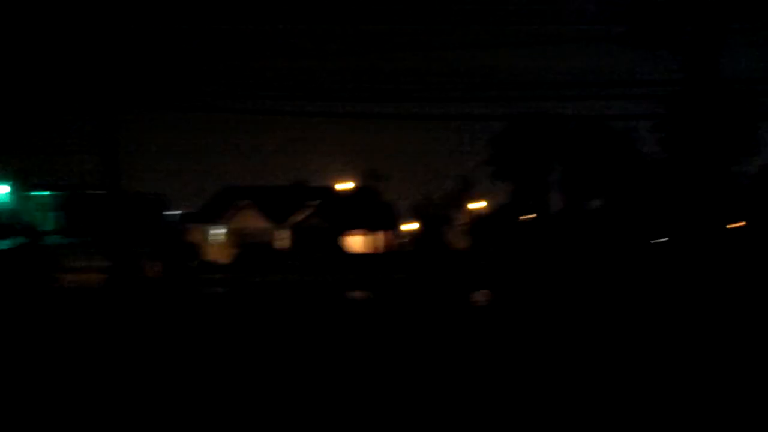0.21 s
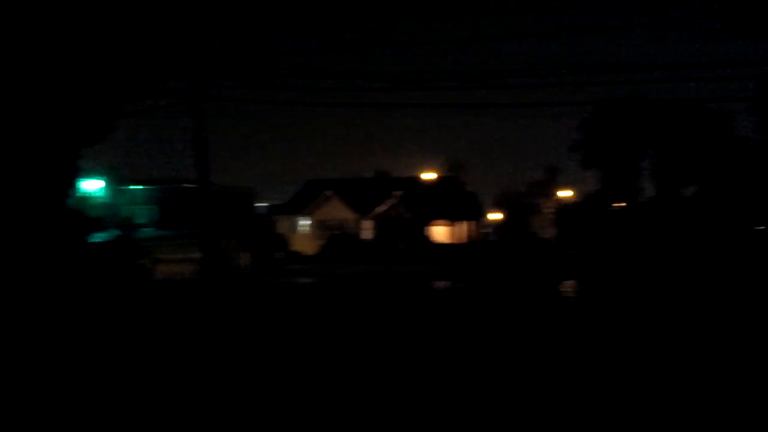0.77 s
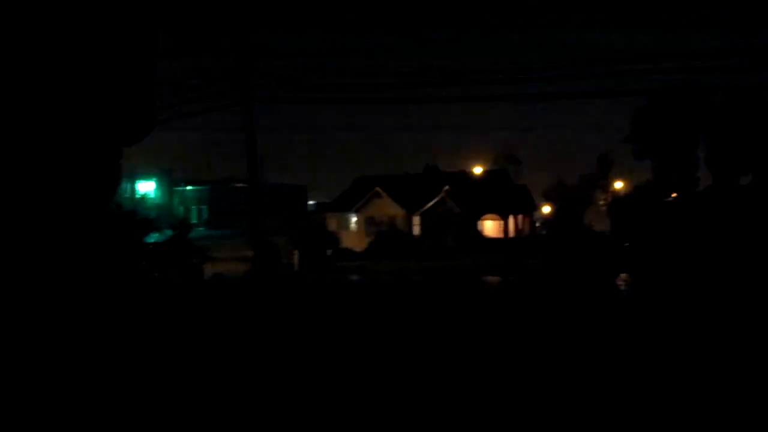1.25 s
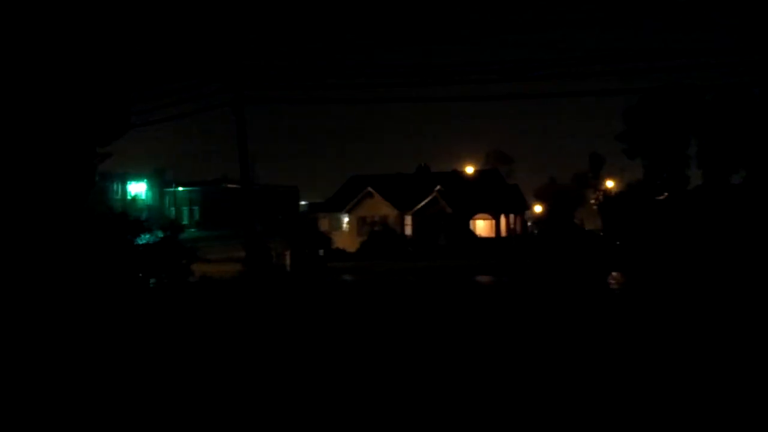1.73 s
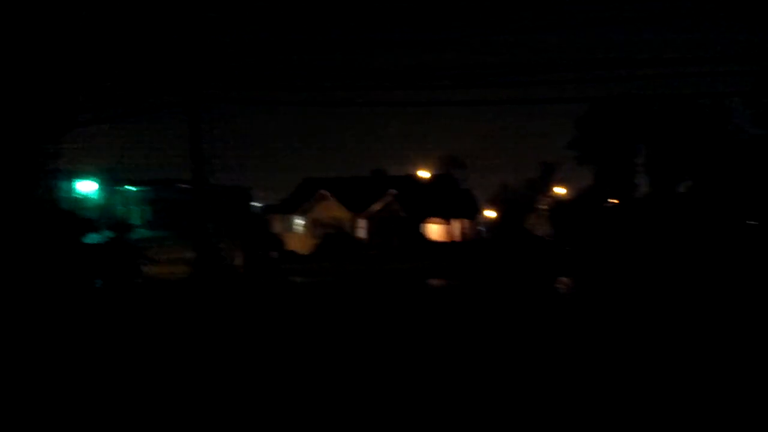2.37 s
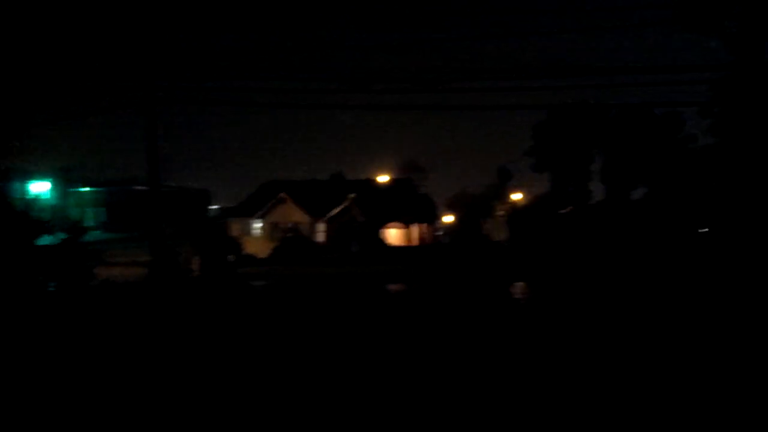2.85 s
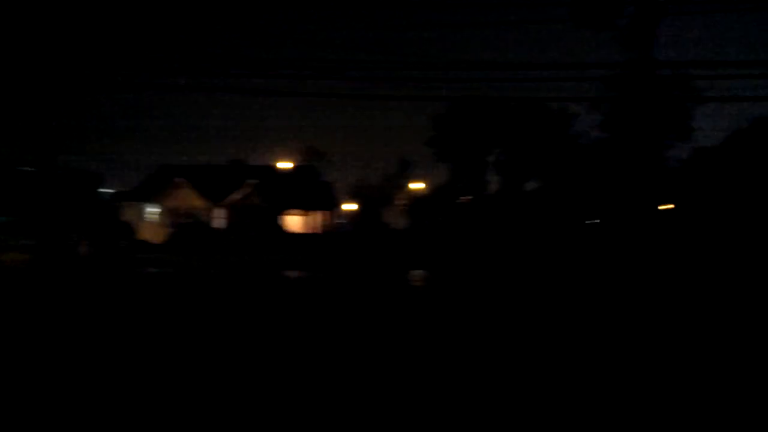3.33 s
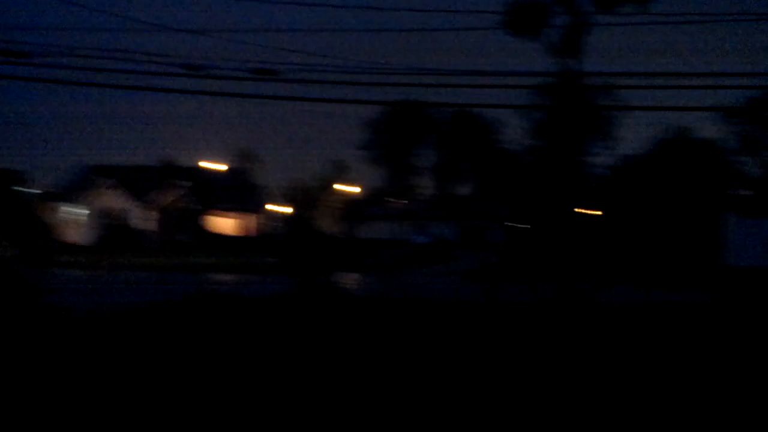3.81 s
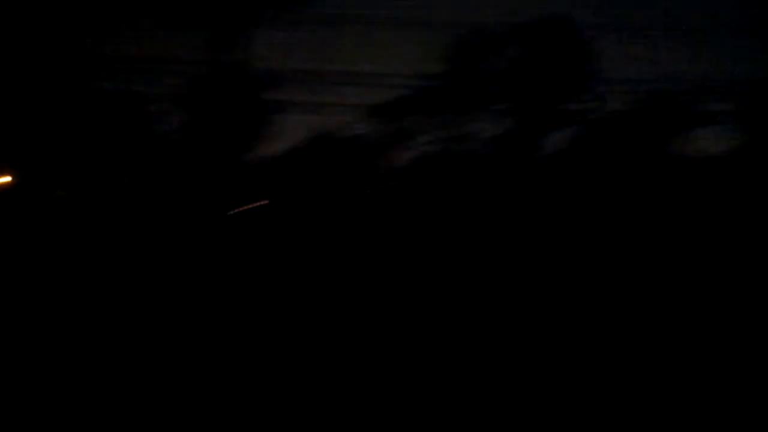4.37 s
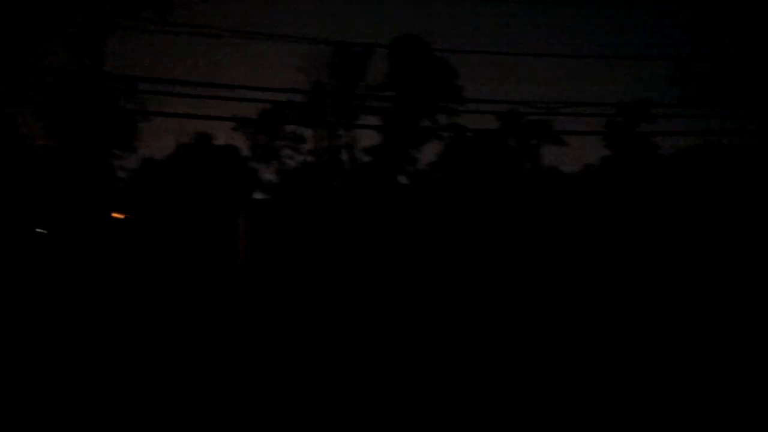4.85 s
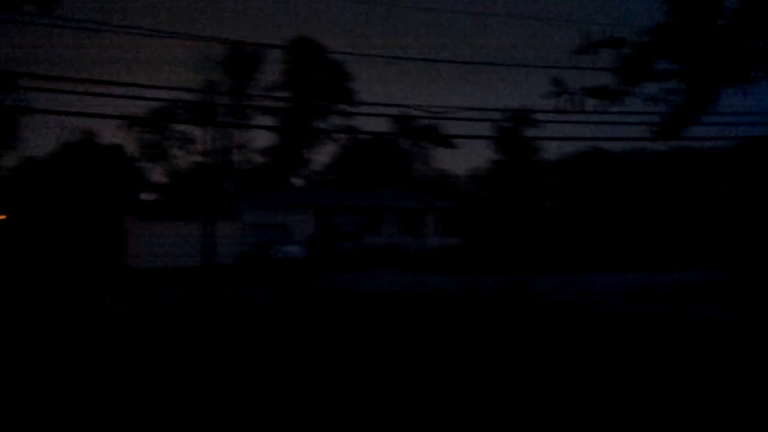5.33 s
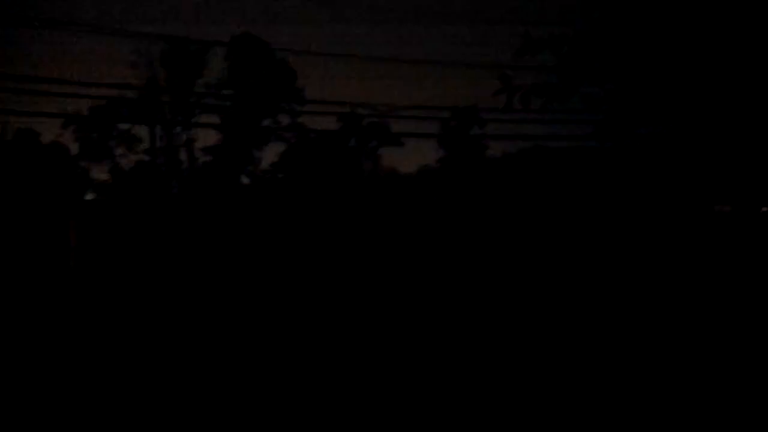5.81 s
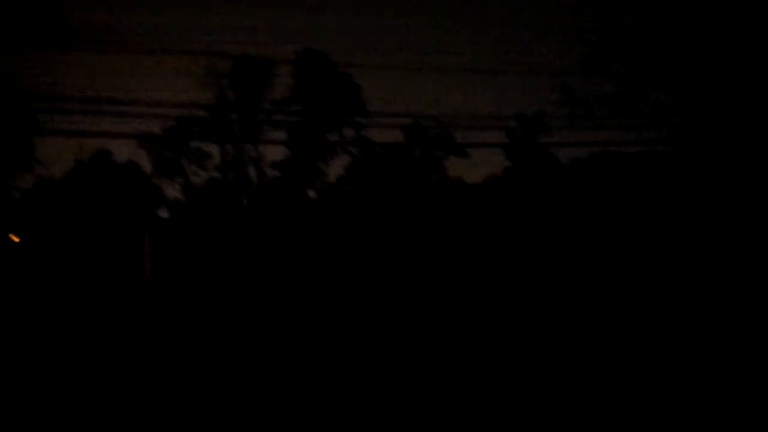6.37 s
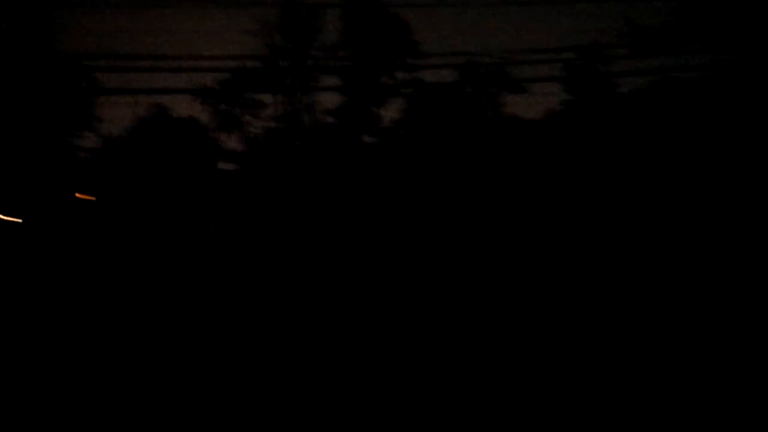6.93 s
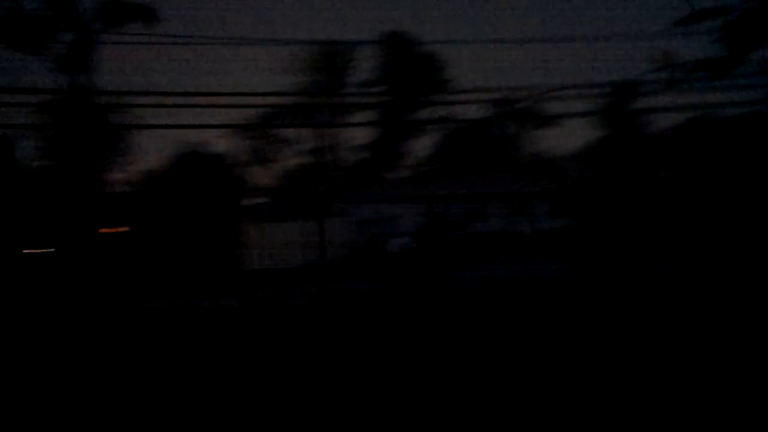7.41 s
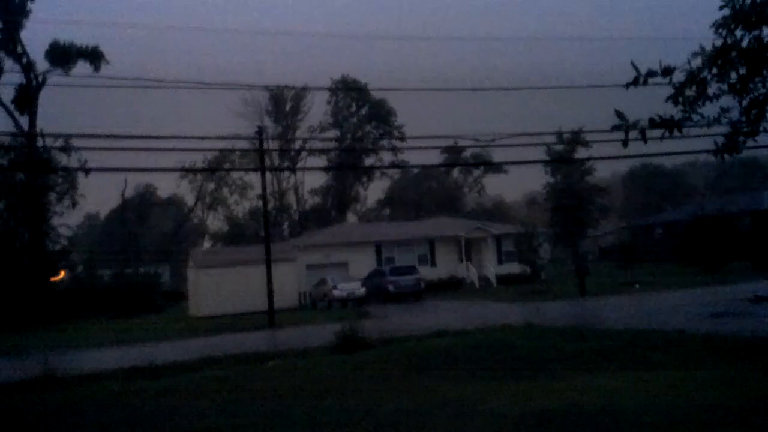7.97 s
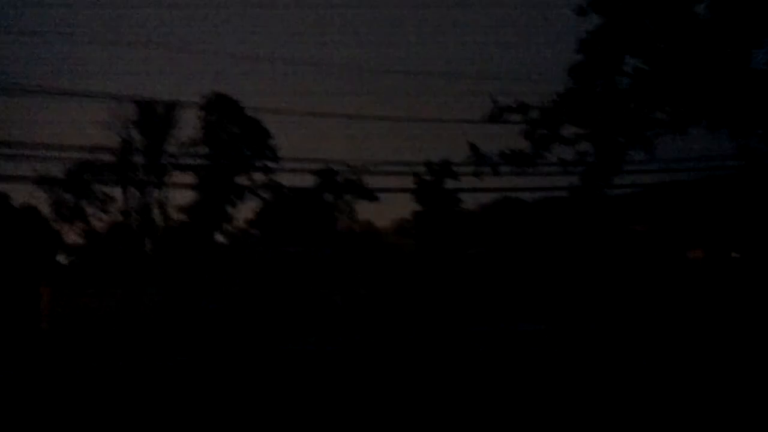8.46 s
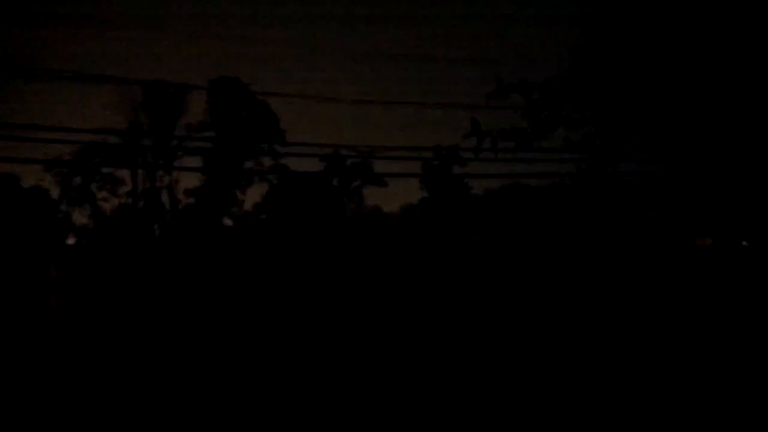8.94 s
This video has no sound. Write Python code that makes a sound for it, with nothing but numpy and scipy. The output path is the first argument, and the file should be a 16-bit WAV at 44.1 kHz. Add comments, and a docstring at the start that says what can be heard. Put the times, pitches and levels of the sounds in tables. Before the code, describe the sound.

Outdoors at dusk, beside a sheltering house, steady rain fills a wide stereo picture: a low wash, a fluttering hiss, and fine close patter leaning right. A low thunder roll is already rising on the left. One prominent hollow drip knocks at 1.1 s. Soft-edged peals overlap from about 0.9 s, strongest between 2 and 4.9 s, lumpy and distant over a wide deep boom. Meanwhile the rain eases, thinnest around 2.7 to 3.5 s, with few close drops. After 5 s the thunder drops away to deep rumbling, with faint swells near 5.9 and 7.4 s. The rain gradually picks up, clearly fuller from 7 s to the end at 9.2 s. Crisp splashes land in front and right, with strong ones near 6.9 and 7.9 s. Hollow drips cluster around 6.8 to 7.1 s, hit hard at 7.7 s, and continue busily, with short wall echoes.

```python
"""Rain, close and far, falls outside a sheltering house, open to the right; the far rain grows fainter and
louder again. Far rain is noise in two parts, a low wash and a fluttering hiss; near drops are bursts of
filtered noise, and drips also ring a hollow surface. Walls echo each drop. Distant thunder, filtered noise
under a roll and separate peals, swells on the left and dies away over a deep boom. Two closely spaced
microphone ports, each minus the delayed other, make the stereo picture."""
import sys
import numpy as np
from scipy import signal
from scipy.fft import rfft, irfft, next_fast_len
from scipy.io import wavfile

SR = 44100
rng = np.random.default_rng(int(sys.argv[2]) if len(sys.argv) > 2 else 0)


def generate_wav(signal):
    """Clip the signal to [-1, 1] and save it as 16-bit WAV at the path in sys.argv[1]."""
    frames = np.transpose(np.atleast_2d(signal))
    scaled = np.clip(frames, -1, 1) * 32767
    pcm = np.round(scaled).astype(np.int16)
    wavfile.write(sys.argv[1], SR, pcm)


N = 405279

# Levels of the far rain over time, before gain: time_s [s], hiss_db [dB], wash_db [dB]
RAIN_LEVELS = [(0.0, -32, -33.5), (0.74, -33, -33.5), (1.36, -38, -38.5), (1.76, -36.5, -36.5),
               (2.28, -37, -38), (2.74, -42, -44.5), (3.07, -44.5, -45), (4.12, -40.5, -43),
               (5.27, -40, -43.5), (7.29, -34, -37.5), (8.75, -33.5, -39.5), (9.19, -32, -37)]
# Spectrum of the far rain: pitch_hz [Hz], density_db [dB per Hz, relative]
RAIN_SPECTRUM = [(60, -48), (200, 3), (450, 1), (700, 0), (950, 0), (1150, 1.5), (1350, 0.5), (1600, 1.5),
                 (1850, 0.5), (2100, -0.5), (4300, -0.9), (6500, -1), (8000, 0.3), (11000, -3),
                 (13000, -7.5), (16000, -11)]
# Near splashes: start_s [s], level_db [dB, relative], pitch_hz [Hz, centre], decay_s [s],
# bearing [-1 left .. 1 right]
SPLASHES = [(0.288, -29, 3500, .0012, .3), (0.381, -27.5, 2780, .0012, .3), (0.464, -33, 7000, .0015, .3),
            (0.586, -30, 7300, 0.0017, .3), (0.677, -31, 1950, 0.0011, .95),
            (1.128, -29, 2070, 0.0016, .95), (1.311, -33.5, 4640, 0.0017, .3),
            (1.353, -35, 6170, 0.0013, .3), (1.577, -31, 1950, 0.0016, .95), (1.825, -32, 4100, 0.0022, .3),
            (2.168, -32.5, 3950, 0.0017, .6), (3.073, -40, 3500, 0.0014, .3), (3.150, -43, 2900, .001, .3),
            (3.287, -46, 1950, 0.0009, .95), (3.614, -34, 3200, .002, .2), (3.812, -39, 7600, .0008, .4),
            (3.943, -39.5, 2860, .001, .3), (4.083, -39, 9500, .0015, .4), (4.086, -39, 825, 0.0062, .3),
            (4.268, -34, 3960, 0.0026, .3), (4.519, -41, 2100, 0.0012, .95), (5.103, -35, 4220, .002, .3),
            (5.275, -38, 9700, .0014, .3), (5.305, -37, 5700, .002, .3), (5.595, -36, 5500, .001, .4),
            (5.896, -35, 7750, .0011, .4), (6.121, -39, 6670, 0.0012, .3), (6.171, -36.5, 3150, .001, .3),
            (6.503, -34, 13000, .003, .3), (6.600, -32.5, 4530, .0025, .3), (6.801, -34, 4000, .0015, .3),
            (6.924, -27, 2820, 0.0016, .2), (7.215, -33, 1800, 0.00094, .95), (7.284, -29, 3850, .0012, .3),
            (7.740, -29.5, 9300, 0.0048, .3), (7.940, -25.5, 4500, .001, .35), (7.970, -36, 4400, .001, .3),
            (8.302, -31, 11500, .0025, .3), (8.359, -33, 3500, 0.0013, .3), (8.536, -34, 10000, .0025, .3)]
# Heavy drips on a hollow surface: start_s [s], level_db [dB, relative]
HEAVY_DRIPS = [(1.128, -9.5), (1.391, -30), (2.197, -24), (3.111, -26), (4.909, -17), (5.024, -15.5),
               (5.914, -21.5), (6.258, -24), (6.791, -16.5), (6.848, -17), (6.900, -16.5), (7.033, -16),
               (7.066, -21), (7.453, -19), (7.705, -10), (7.74, -21), (7.903, -19.5), (8.362, -15.5),
               (8.610, -16.5), (8.674, -21), (8.873, -15.5), (8.999, -14.5), (9.064, -15)]
# Stream of light drips, lowest level of a drip over time: time_s [s], level_db [dB, relative]
TRICKLE = [(0, -53), (3.0, -58), (4.8, -49.5), (7.0, -48.5), (9.19, -45)]
# Modes of the hollow surface: pitch_hz [Hz], level_db [dB, relative], t60_s [s, time to fall 60 dB]
HOLLOW_MODES = [(1104, -17, 0.06), (1480, 4, 0.0096), (1597, -2, 0.056), (1850, 2.5, 0.007),
                (2140, -10, 0.035)]
# Spectrum of the thunder: pitch_hz [Hz], density_db [dB per Hz, relative]
THUNDER_SPECTRUM = [(25, -24), (60, -28), (90, -13), (130, -3.5), (178, 1), (203, -2.5), (232, 2), (288, 2),
                    (322, -8), (430, -10.5), (600, -28), (1200, -37), (3000, -77)]
# Long roll under the peals: time_s [s], level_db [dB, relative], brightness_db [dB, upper over deep band]
ROLL = [(0, -37.5, 0), (0.3, -32, 3.5), (2.9, -28.5, -4), (4.7, -31, -6), (5.6, -36.5, -14.5),
        (9.19, -43.5, -9.5)]
# Peals of thunder: start_s [s, full strength], level_db [dB, relative], hold_s [s],
# brightness_db [dB, upper over deep band]
PEALS = [(0.86, -32.5, 0.063, -12), (1.187, -31.5, 0.1, -10), (1.9, -32, 0.043, -10),
         (2.1, -27, 0.08, -2.5), (2.502, -26, 0.025, -8), (2.694, -28, 0.053, -20),
         (3.198, -30.5, 0.29, -6), (3.997, -26, 0.12, -2.5), (4.286, -26, 0.053, -6),
         (4.76, -29, 0.12, -11), (5, -31, 0.033, -19), (5.128, -33, 0.052, -25), (5.372, -51, 0.033, -22),
         (5.846, -39.5, 0.21, -6), (7.366, -40, 0.098, -14), (7.54, -41, 0.1, -2)]

PORT_LAG = 16  # samples that sound takes from one port to the other
CROSSOVER_HZ = 2700  # the wash lies below, the hiss above
BANDS_HZ = np.geomspace(1800, 14400, 7)  # edges of the bands in which the hiss flutters
ECHO_S, ECHO_SPREAD = 0.0042, 0.35  # mean delay of the wall echo, and its random spread as a fraction
THUNDER_BEARING = -0.34  # -1 left .. 1 right
PEAL_ATTACK_S, PEAL_RELEASE_S = 0.055, 0.18  # time constants of swelling and dying away
CUTOFF_HZ = 15800  # top of the microphone's range


def far_rain(wash_db, hiss_db, flutter_db=1.56, together_db=0.86):
    """Countless drops on ground and leaves merge into noise; each band of the hiss flutters on its own."""
    wash = coloured(outdoors(right_db=4.5, open_db=-9.5), RAIN_SPECTRUM)
    wash = butter(wash, CROSSOVER_HZ, "low", order=3)
    hiss = coloured(outdoors(right_db=-1.5, open_db=-5.5), RAIN_SPECTRUM)
    hiss = butter(hiss, CROSSOVER_HZ, "high", order=3)
    size = next_fast_len(N)
    spectrum, hz = rfft(hiss, size), np.fft.rfftfreq(size, 1 / SR)
    for low, high in zip(BANDS_HZ, BANDS_HZ[1:]):
        band = irfft(spectrum * ((hz >= low) & (hz < high)), size)[:, :N]
        hiss = hiss + band * (from_db(flutter_db * drift(55)) - 1)
    wash_gain = from_db(wash_db + 3.0 + 1.0 * drift(45))
    hiss_gain = from_db(hiss_db - 2.08 + together_db * drift(30))
    return wash * wash_gain + hiss * hiss_gain


def patter(hiss_db, spread_db=4.0, level_db=-9.0, top_db=-2, decay_s=0.0013, count=900):
    """Small drops land at random close by, mostly faint, a few strong; higher pitches are weakened."""
    when, pitch, place, size = rng.random((4, count))
    strength = np.minimum(-np.log(1 - size), 2.4)
    db = spread_db * strength + top_db * pitch ** 2
    hz = 2200 * 4.6 ** pitch
    bearing = 1 - 1.6 * place ** 2  # most land on the right
    decays = np.full(count, decay_s)
    drops = splashes(when * N / SR, db, hz, decays, bearing, sharpness=1.6, echo_db=-7.5)
    return rms_one(drops) * from_db(hiss_db + level_db)


def big_drops(level_db=-4.0):
    """Single large drops burst into spray, in front and to the right."""
    s, db, hz, decay_s, bearing = np.transpose(SPLASHES)
    return splashes(s, db + level_db, hz, decay_s, bearing, sharpness=2.2, echo_db=-6.5, tick=0.3)


def drips(heavy_db=-17.0, splat_db=-7.5, splat_s=0.00098, count=420):
    """Heavy drips and a random stream of lighter ones splat on a hollow surface and stir its modes."""
    s, db = np.transpose(HEAVY_DRIPS)
    when, size = rng.random((2, count))
    trickle_db, = in_time(TRICKLE)
    light_db = trickle_db[(when * N).astype(int)] + 5 * size
    s = np.append(s, when * N / SR)
    db = np.append(db + heavy_db, light_db)
    alike = np.ones(len(s))
    force = splashes(s, db, 1550 * alike, splat_s * alike, .25 * alike,
                     sharpness=1.34, echo_db=-6.5, tick=0.24)
    force = force + 1e-18  # keeps the filters off vanishingly small numbers
    out = from_db(splat_db) * force
    for k, (hz, mode_db, t60) in enumerate(HOLLOW_MODES):
        radius = from_db(-60 / (t60 * SR))
        angle = 2 * np.pi * hz / SR
        resonator = [1, -2 * radius * np.cos(angle), radius * radius]
        ring = signal.lfilter([1, -1], resonator, force)
        out = out + (-1) ** k * from_db(mode_db - 37.5) * ring  # neighbouring modes have opposite signs
    return out


def splashes(s, db, hz, decay_s, bearing, sharpness, echo_db, tick=0.57):
    """Each drop ticks, bursts into brief spray around a pitch of its own, and echoes once off a wall."""
    t = np.arange(1024) / SR
    age = t / np.maximum(decay_s, 2e-4)[:, None]
    spray = rng.standard_normal(age.shape) * age ** .5 * np.exp(-age)
    spray[:, 0] = tick * np.linalg.norm(spray, axis=1)
    # a resonance centred on each drop's pitch
    ratio = (np.fft.rfftfreq(len(t), 1 / SR) + 1) / hz[:, None]
    spray = irfft(rfft(spray) / (1 + 1j * sharpness * (ratio - 1 / ratio)))
    walls = rng.uniform(-1, 1, (len(s), 2))
    out = np.zeros((2, N))
    for when, level, side, burst, (farther, wall_side) in zip(s, db, bearing, spray, walls):
        burst = from_db(level) * rms_one(burst)
        echo_at = when + ECHO_S * (1 + ECHO_SPREAD * farther)
        add(out, when, arrive(burst, side))
        add(out, echo_at, arrive(from_db(echo_db) * burst, wall_side))
    return out


def shelter(ports, tail_db, t60=0.13):
    """The walls scatter a short noise tail, strongest on the right, fed by the right port's sound."""
    t = np.arange(SR // 3) / SR
    tail = all_round(len(t), right_db=16.0) * from_db(-60 * t / t60) * (t > ECHO_S)
    tail = tail / np.sqrt(np.sum(tail[0] ** 2))
    return ports + from_db(tail_db) * signal.fftconvolve(ports[1:], tail, axes=1)[:, :N]


def thunder(deep_db=-9.5, upper_db=-5.0, scatter_db=-8):
    """Shocks from along a distant bolt merge into noise: a lumpy roll on the left, partly scattered."""
    bolt = butter(rng.standard_normal(N), 4000, "low")
    n = np.arange(N)
    right = np.interp(n + THUNDER_BEARING * PORT_LAG, n, bolt)  # reaches the right port later
    direct = np.stack([bolt, right])
    scattered = from_db(scatter_db) * all_round(N, right_db=-2.0)
    waves = coloured(direct + scattered, THUNDER_SPECTRUM)
    deep = rms_one(butter(waves, 183.4, "low", order=4))
    deep = deep * thunder_gain(upper=False) * from_db(deep_db + 0.87 * drift(14))
    upper = rms_one(butter(waves, 217, "high", order=4))
    upper = upper * thunder_gain(upper=True) * from_db(upper_db + 0.22 * drift(8.1))
    return deep + upper


def thunder_gain(upper):
    """Strength of the deep rumble or of the upper roll: the long roll and the peals add in power."""
    lean = .5 if upper else -.5  # brightness is shared between the two bands
    roll_db, roll_bright_db = in_time(ROLL)
    power = from_db(roll_db + lean * roll_bright_db) ** 2
    for s, db, hold_s, bright_db in PEALS:
        power = power + (from_db(db + lean * bright_db) * peal(s, hold_s)) ** 2
    return np.sqrt(power)


def peal(s, hold_s):
    """Envelope of one peal: exponential swell up to its time, hold, exponential release."""
    age = np.arange(N) / SR - s
    attack = np.minimum(age, 0) / PEAL_ATTACK_S
    release = np.maximum(age - hold_s, 0) / PEAL_RELEASE_S
    return np.exp(attack - release)


def boom(level_db=-33.5, follows=0.66, low_hz=72, high_hz=96, lumps_db=5.5):
    """The lowest boom swells less than the thunder and differs between the two ports, so it sounds wide."""
    waves = butter(rng.standard_normal((2, N)), low_hz, "high", order=5)
    waves = butter(waves, high_hz, "low", order=5)
    swell = thunder_gain(upper=False) ** follows
    return rms_one(waves) * swell * from_db(level_db + lumps_db * drift(5.5))


def outdoors(right_db, open_db):
    """Noise from all round, plus a share from the open side on the right; rms 1."""
    open_side = arrive(rng.standard_normal(N), 1.0)
    return rms_one(all_round(N, right_db) + from_db(open_db) * open_side)


def all_round(length, right_db, count=17):
    """Unrelated noise from every bearing, leaning right if right_db is positive, else left; rms 1."""
    bearings = np.linspace(-1, 1, count)
    return rms_one(sum(from_db(right_db * b) * arrive(rng.standard_normal(length), b) for b in bearings))


def arrive(x, bearing):
    """A sound at the left and right port: the nearer port hears it first."""
    lag = int(round(np.clip(bearing, -1, 1) * PORT_LAG))
    return np.stack([np.roll(x, max(lag, 0)), np.roll(x, max(-lag, 0))])


def coloured(x, spectrum):
    """Filters a noise to a smooth spectrum; rms 1."""
    size = next_fast_len(N)
    hz, db = np.transpose(spectrum)
    gain = from_db(np.interp(np.log(np.fft.rfftfreq(size, 1 / SR) + 1), np.log(hz), db))
    return rms_one(irfft(rfft(x, size) * gain, size)[..., :N])


def drift(per_s):
    """Random points, so many a second, joined by straight lines; rms 1."""
    turns = np.arange(N) / SR * per_s
    return rms_one(np.interp(turns, np.arange(N), rng.standard_normal(N)))


def in_time(rows):
    """Each column of a curve table at every sample."""
    s, *columns = np.transpose(rows)
    return [np.interp(np.arange(N) / SR, s, c) for c in columns]


def add(track, s, sound):
    """Mixes a short sound into a track at time s."""
    start = int(np.clip(round(s * SR), 0, N - 1))
    track[..., start:start + sound.shape[-1]] += sound[..., :N - start]


def butter(x, hz, kind, order=2):
    """Butterworth filter, low- or high-pass."""
    sos = signal.butter(order, np.clip(hz, 10, .45 * SR), kind, fs=SR, output="sos")
    return signal.sosfilt(sos, x)


def from_db(db):
    """Decibels to amplitude."""
    return 10 ** (np.asarray(db) / 20)


def rms_one(x):
    """Scales a sound to rms 1 over all its samples."""
    return x / np.sqrt(np.mean(x ** 2) + 1e-20)


def scene(hiss_gain_db=3.5, wash_gain_db=3.0):
    """Sound pressure at the two ports: near and far rain, drips, thunder and boom."""
    hiss_db, wash_db = in_time(RAIN_LEVELS)
    hiss_db, wash_db = hiss_db + hiss_gain_db, wash_db + wash_gain_db
    near = shelter(butter(patter(hiss_db), 13300, "low"), tail_db=-2.5)
    closest = shelter(big_drops() + drips(), tail_db=-2.5)
    return far_rain(wash_db, hiss_db) + near + closest + thunder() + boom()


def record(dry, mismatch_db=2.5, lift_db=6, lift_hz=190, gain_db=-2.0):
    """Each port minus the delayed other points a channel sideways; a shelf lifts the bass, the top is cut."""
    ports = dry * from_db([[mismatch_db], [-mismatch_db]])  # the left port is the more sensitive
    delayed_other = np.pad(ports[::-1], ((0, 0), (PORT_LAG, 0)))[:, :N]
    beams = ports - delayed_other
    bass = butter(beams, lift_hz, "low", order=1)
    beams = from_db(gain_db) * (beams + from_db(lift_db) * bass)
    top_cut = signal.ellip(12, .1, 80, CUTOFF_HZ, fs=SR, output="sos")
    return signal.sosfilt(top_cut, beams)


dry = scene()
out = record(dry)
generate_wav(out)
```